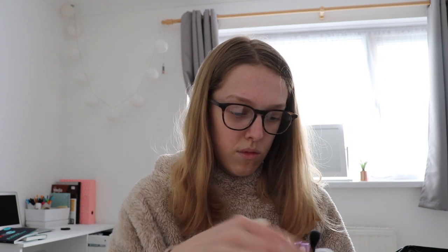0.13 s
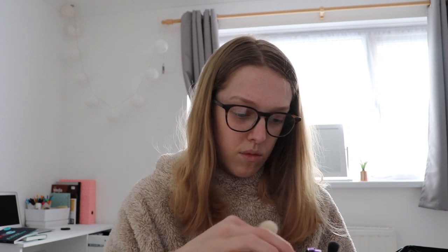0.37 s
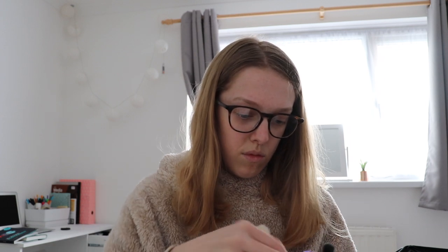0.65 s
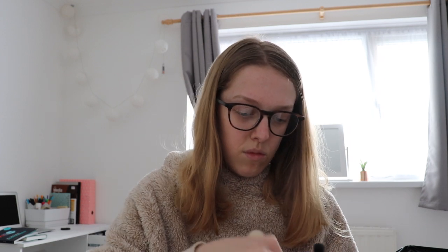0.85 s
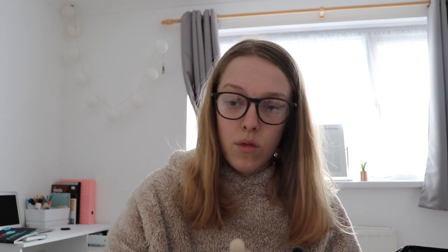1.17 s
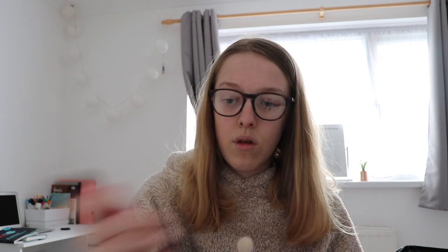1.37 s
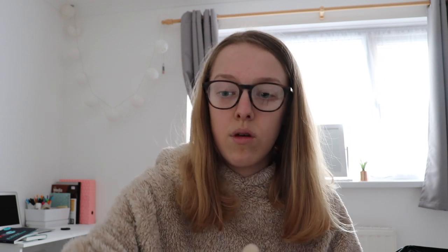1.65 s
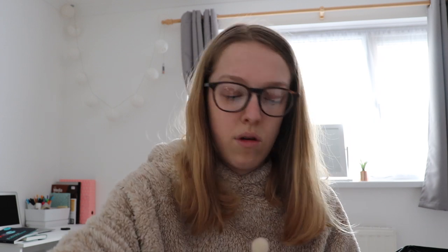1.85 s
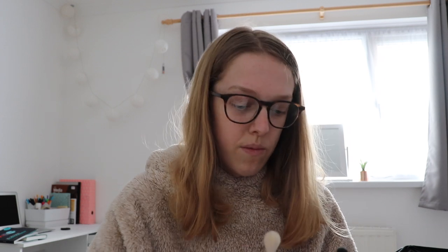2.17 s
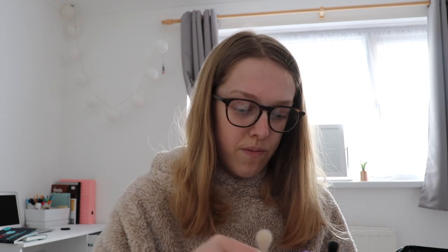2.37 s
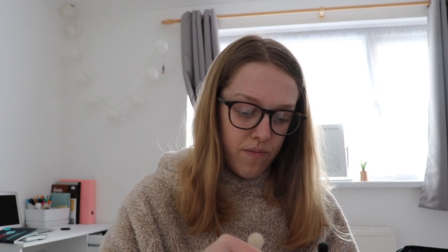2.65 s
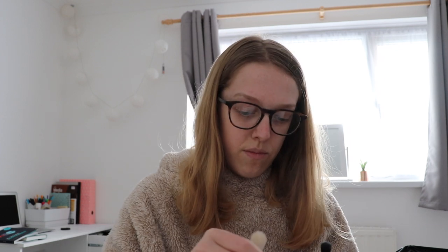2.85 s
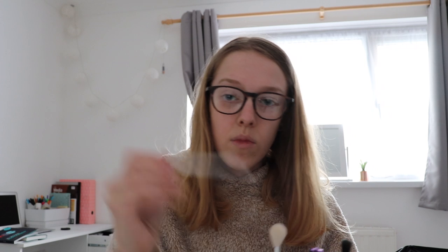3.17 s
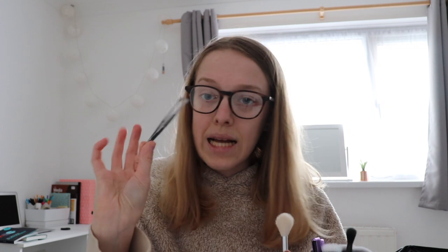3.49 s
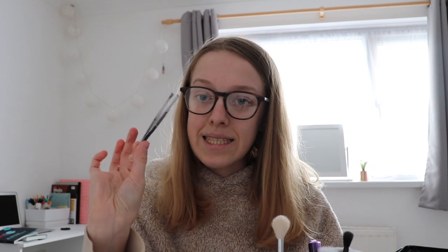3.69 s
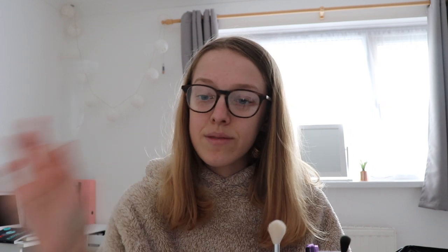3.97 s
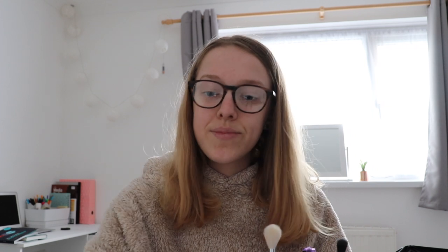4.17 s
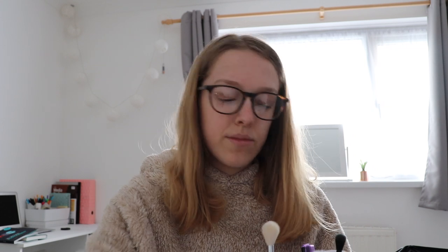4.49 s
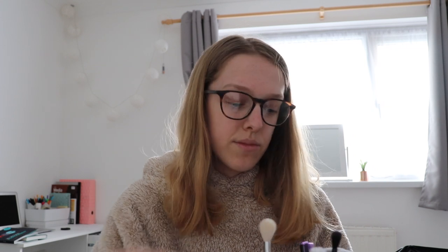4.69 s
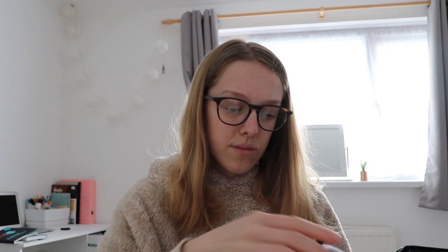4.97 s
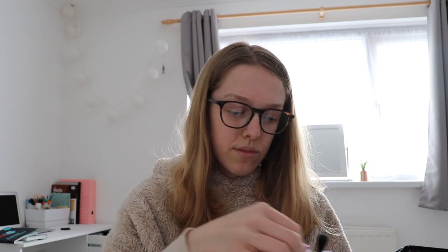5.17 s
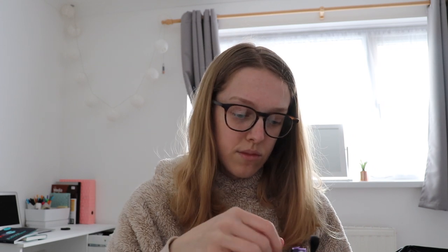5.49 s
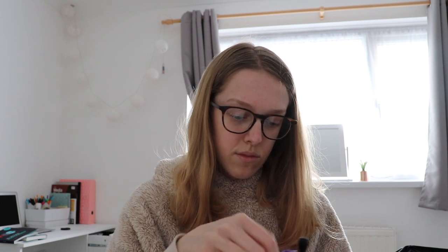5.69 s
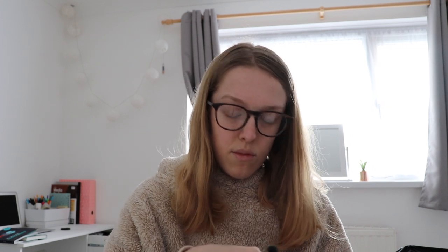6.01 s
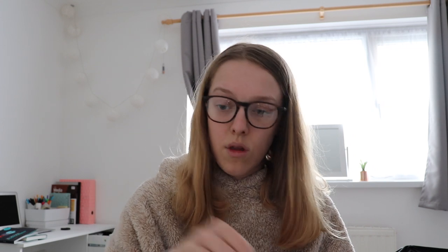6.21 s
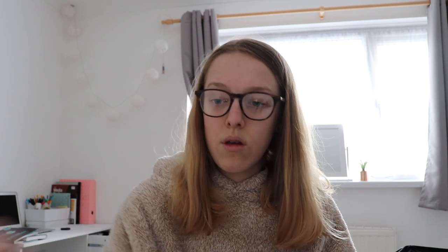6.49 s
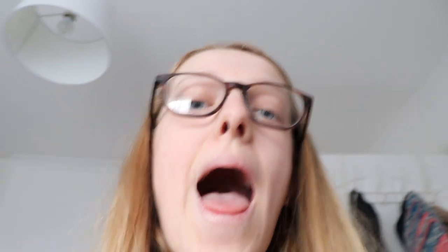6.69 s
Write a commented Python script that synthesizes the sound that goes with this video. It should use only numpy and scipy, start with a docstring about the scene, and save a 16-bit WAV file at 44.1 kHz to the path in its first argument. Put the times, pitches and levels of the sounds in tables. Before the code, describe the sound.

Close to the microphone in a small, quiet bedroom, a hand sorts through a bag of plastic makeup tubes, which click, knock and rustle. One tube drops into the bag and chatters. A hard piece lands on the desk, bounces and rocks. After more clicking, a second piece lands loudly and tumbles with a thin metallic ring. The sorting resumes, followed by a soft, close bump.

```python
"""A hand sorts through a bag in a small, still bedroom: plastic makeup tubes click, knock and slide.
At 1.2 s a tube drops into the bag and chatters to rest. At 1.9 s a piece lands on the desk, bounces and
rocks; then rubbing draws a hollow note from the bag. At 4.4 s a second piece lands and tumbles over its
facets while a metal part rings. Sorting resumes, with a soft, close bump at 6.6 s.
Throughout, the closest clicks overload the microphones."""
import sys
import numpy as np
from scipy import signal
from scipy.fft import rfft, irfft, next_fast_len
from scipy.io import wavfile

SR = 44100
rng = np.random.default_rng(int(sys.argv[2]) if len(sys.argv) > 2 else 0)


def inscribe(sig):
    """Save sig as 16-bit PCM at rate SR to the path in sys.argv[1].

    A 1-D sig is mono; a 2-D sig holds one channel per row.
    Samples are clipped to [-1, 1] before scaling.
    """
    pcm = np.round(np.clip(np.atleast_2d(sig).T, -1, 1) * 32767)
    wavfile.write(sys.argv[1], SR, pcm.astype(np.int16))


N = 302085
TIME_S = np.arange(N) / SR

# knock, clack, click and tick ranges: low_hz, high_hz
REGISTERS = [(150, 1200), (1200, 2800), (2800, 6500), (6500, 16000)]
# resonances of the tubes and full bag: centre_hz, width_hz, gain_db
TUBE_MODES = [(437, 128, 1.5), (582.3, 23.2, 7.5), (647, 27.5, -14), (852, 14, -11.5), (1009, 146.4, 10),
              (1538, 88, -7.5), (1916, 99, -3.5), (3304, 567, 4.5), (4883, 223, -4), (5906, 683, 7),
              (6597, 707, 8.5)]
# resonances of the desk top: centre_hz, width_hz, gain_db
DESK_MODES = [(150.8, 13.4, 6.5), (192.5, 13, 14), (264.2, 28, 6.5), (299, 28, 4), (338.4, 58, 5.5),
              (488.6, 70, -1.5), (578.2, 126, 8.5), (678.8, 29.6, 4.5), (772, 22, 5.5), (1215.6, 12.7, 8.5),
              (2110, 46, 3.5), (3240, 800, 0)]
# plastic contact spectrum: freq_hz, level_db
PLASTIC_COLOUR = [(100, -49.5), (300, -16.5), (500, 3.5), (1200, 3.5), (3500, 18), (6000, 14.5),
                  (9500, 4.5), (12000, -2.5), (16000, -6.5)]
# desk contact spectrum: freq_hz, level_db
BOARD_COLOUR = [(70, -14), (180, -5), (600, 1), (1100, 6), (4000, 8.5), (7500, 15), (10000, -10),
                (16000, -22)]
# reverb send of the metal ring and chink: freq_hz, gain_db
METAL_WET = [(6000, -11), (15000, -12.5)]


def tube_clicks():
    """Hollow plastic tubes click together, each with its own note."""
    # tube on tube: start_s, level_db, tilt_db_per_octave, ring_hz, t60_s
    clicks = [(.0093, -23, -0.5, 2693, 0.0665), (.1743, -22.5, 1.37, 6370, 0.0206),
              (0.1827, -25.5, 1.5, 9400, 0.104), (.23, -29.5, 0, 5900, 0.047),
              (0.2583, -14, -0.32, 3630, 0.0307), (.2835, -19.5, 1.5, 3470, 0.054),
              (0.3333, -23.5, 2, 3670, 0.07), (.445, -24.5, 0.5, 3480, 0.047),
              (0.5105, -14, 0.5, 5630, .022), (.5514, -29, -1, 4600, 0.088), (.627, -38.5, -2, 4960, 0.066),
              (.8845, -26, -1, 3510, 0.055), (.942, -30, 1.5, 5500, 0.0184),
              (0.9827, -29.5, 1.5, 5500, 0.052), (1.0079, -26.5, -0.5, 5400, 0.0093),
              (1.017, -28, -1, 3430, 0.0505), (1.036, -34, 4, 4500, 0.0195),
              (1.0789, -27.5, -0.5, 3000, 0.0224), (1.1285, -35.5, 3.5, 7300, 0.0155),
              (1.521, -47.5, -1, 2100, 0.0106), (1.841, -26.5, 1, 3640, 0.086),
              (1.8578, -24.5, 0.5, 5400, 0.082), (1.8671, -22, -2, 4890, 0.038),
              (2.6152, -19, 1.5, 3490, 0.062), (2.6327, -19, 0.78, 3260, 0.029),
              (2.6564, -24.5, -.5, 5020, 0.0305), (2.8092, -32.5, -1, 3300, 0.043),
              (2.8628, -39, -2, 4880, 0.039), (2.995, -31, -0.08, 3290, 0.0326),
              (3.0805, -33, 2.5, 5300, 0.36), (3.1414, -17, 0.64, 3410, 0.0269),
              (3.3622, -25, 1.5, 10700, 0.016), (3.4014, -46, 0, 4900, 0.0114),
              (3.6158, -36, 0, 5000, 0.00302), (4.164, -51, -3.5, 1700, 0.015),
              (5.267, -42, -3, 2820, 0.041), (5.2987, -19.5, 0.02, 3270, 0.0755),
              (5.3318, -25, 0, 5600, 0.116), (5.457, -41, -2, 3490, 0.051),
              (5.5405, -32.5, 1, 5706, 0.0145), (5.967, -32, -0.5, 4320, 0.0274),
              (6.0011, -30.5, -0.5, 3500, 0.063), (6.0508, -11, 1.35, 2130, 0.017),
              (6.2033, -30, 0, 3730, 0.0106), (6.2509, -24, 0, 6240, 0.066),
              (6.3222, -23.5, 0.5, 6800, 0.166), (6.33, -19, 3, 6770, 0.0333),
              (6.4411, -27.5, -0.66, 3340, 0.0277)]
    # balance per register: gain_db
    mix_db = [-16.5, -5.5, 1.5, -2]
    out = np.zeros((2, N))
    for start_s, level_db, tilt, ring_hz, t60_s in clicks:
        click = contact(tilted(mix_db, level_db, tilt), PLASTIC_COLOUR, TUBE_MODES, t60_s,
                        ring_hz, ring_db=5, ring_q=14.7, bass_hold=1.343)
        add(out, start_s, in_bag(click))
    return out * amp(3)


def tube_knocks():
    """Tubes knock on the bottom of the bag, all with one dull voice."""
    # tube on bag: start_s, level_db
    knocks = [(.0005, -31), (.0311, -35), (0.6771, -35.5), (.6972, -40), (.7099, -43.5), (1.0417, -40),
              (1.0827, -42.5), (5.5244, -44.5), (5.924, -51.5), (5.9751, -38.5), (6.0111, -37.5)]
    mix_db = np.array([2, -12.5, -15, -15.5])
    out = np.zeros((2, N))
    for start_s, level_db in knocks:
        knock = contact(level_db + mix_db, PLASTIC_COLOUR, TUBE_MODES, t60_s=0.0539,
                        ring_hz=970, ring_db=-5, ring_q=11.2, bass_hold=0.964)
        add(out, start_s, in_bag(knock))
    return out * amp(3)


def dropped_tube():
    """A tube falls into the bag, booms, lands three times and chatters in ever shorter hops."""
    # landings: start_s, level_db, tilt_db_per_octave
    drops = [(1.2227, -23, -2), (1.2506, -18, .5), (1.2806, -12.5, 1)]
    # resonances of the tube: centre_hz, width_hz, relative_db
    body_modes = [(597, 15.8, -3.5), (865, 195, -4), (1488, 59, -1.5), (2206, 104, -9.5), (2730, 36, -13.5),
                  (3228, 95, -5.5), (3455, 200, 0), (4200, 51, -5.5), (5460, 32, -19.5)]
    # lowest bag modes, swung by the first landing: pitch_hz, level_db, t60_s
    bag_modes = [(595, -18, .13), (830, -22, .05)]
    chatter_s, chatter_db, hop_s, shrink, loss_db = 1.3145, -25.5, 0.017, 0.94, 3.5
    mix_db = [-1.5, -3, 2.5, -13.5]
    hops = [(chatter_s + hop_s * (1 - shrink ** k) / (1 - shrink), chatter_db - loss_db * k, -1.2)
            for k in range(5)]
    body = [(hz, width_hz, db + 13.5) for hz, width_hz, db in body_modes]
    out = np.zeros((2, N))
    for start_s, level_db, tilt in drops + hops:
        blow = contact(tilted(mix_db, level_db, tilt), PLASTIC_COLOUR, body, t60_s=0.0338,
                       ring_hz=3360, ring_db=1, ring_q=7.7, bass_hold=1.56)
        add(out, start_s, in_bag(blow))
    add(out, drops[0][0], in_bag(sum(damped_note(*mode) for mode in bag_modes)))
    return out


def desk_landings():
    """Hard pieces strike the desk and bounce; the board booms under them."""
    # piece on desk: start_s, level_db, tilt_db_per_octave, ring_hz, t60_s, boom_db, boom_hz
    hits = [(1.922, -14.5, 2.5, 5360, 0.034, -24.5, 643), (1.948, -28, -2.1, 4500, 0.049, -34, 299),
            (1.9594, -39, -6, 3570, 0.051, -21.5, 624), (1.973, -9, 0.26, 4700, 0.0056, -31, 520),
            (2.0647, -19.5, -1.02, 3100, 0.00575, -15, 648), (2.0837, -21, -0.6, 2960, 0.06, -23.5, 288),
            (2.1089, -33, -2, 2880, 0.031, -27, 271), (2.2227, -52, -4, 870, 0.047, -36, 608),
            (2.4418, -17, 1.2, 11000, 0.0079, -19, 664.5), (4.4231, -16, -1.43, 5771, 0.00493, -23, 639),
            (4.442, -29.5, 1, 6000, 0.033, -39.5, 600), (4.4629, -8, -0.69, 2990, 0.0107, -10.5, 498.1),
            (4.508, -19, 3.53, 8480, 0.056, -42.5, 557), (4.533, -14, 0, 6200, 0.0114, -26.5, 478),
            (4.569, -20, -1.5, 1610, 0.0167, -33, 563), (4.647, -13.5, 0.5, 3990, 0.0097, -48, 570),
            (4.668, -22, 0, 4020, 0.0466, -42, 570)]
    mix_db = [-6.5, -3.5, 0.5, -3]
    out = np.zeros((2, N))
    for start_s, level_db, tilt, ring_hz, t60_s, boom_db, boom_hz in hits:
        blow = contact(tilted(mix_db, level_db, tilt), BOARD_COLOUR, DESK_MODES, t60_s,
                       ring_hz, ring_db=0, ring_q=5.28, bass_hold=1.65)
        add(out, start_s, on_desk(blow + damped_note(boom_hz, boom_db, t60_s=0.0345)))
    return out


def chink():
    """A bright, choked note as the first piece touches the desk."""
    note = damped_note(pitch_hz=8430, level_db=-5, t60_s=0.022)
    out = np.zeros((2, N))
    add(out, 1.9221, placed(note, lead_samples=9.65, pan_db=5.5, wet=METAL_WET, near_db=-18))
    return out


def rocking():
    """The first piece rocks to rest: three weakening swings, silent at each turning point."""
    # rocking spectrum: freq_hz, level_db
    colour = [(100, -24.5), (170, -6.5), (400, -6.5), (600, -2.5), (800, -12.5), (1200, -43), (5000, -27)]
    start_s, swing_s, level_db, loss_db = 2.07, 0.09834, -42, 3
    swings = np.clip((TIME_S - start_s) / swing_s, 0, 3)
    speed = amp(level_db - loss_db * swings) * np.abs(np.sin(np.pi * swings))
    rumble = grains(colour, DESK_MODES, rate_per_s=4000, spread_db=3)
    return on_desk(speed * rumble)[:, :N]


def tumbling():
    """The second piece rumbles louder until it is stopped, while the taps of its facets weaken."""
    # rolling spectrum: freq_hz, level_db
    colour = [(80, -41.5), (180, -3), (500, -6), (950, -0.5), (1500, -5), (2500, -11), (4000, -17),
              (6500, -29.5), (9000, -35), (15000, -61.5)]
    # resonances of the barrel: centre_hz, width_hz, gain_db
    barrel_modes = [(1274, 71, 7), (1617, 40, 12), (2264, 110, 3), (2943, 160, 0), (3665, 120, 14)]
    start_s, stop_s, release_s, roll_db, growth_db_per_s = 4.425, 4.785, 0.0247, -35, 20
    first_tap_s, spacing_s, tap_db, loss_db = 4.571, 0.0245, -24.5, 1.23
    mix_db = np.array([-6.5, 3.5, -5.5, -12.5])
    modes = DESK_MODES + barrel_modes
    gate = (TIME_S > start_s) * np.clip(1 - (TIME_S - stop_s) / release_s, 0, 1)
    envelope = gate * amp(roll_db + growth_db_per_s * (TIME_S - start_s))
    out = on_desk(envelope * grains(colour, modes, rate_per_s=4000, spread_db=3))[:, :N]
    for k in range(10):
        tap = contact(tap_db - loss_db * k + mix_db, BOARD_COLOUR, modes, t60_s=0.0246,
                      ring_hz=1595, ring_db=5, ring_q=26, bass_hold=0.84)
        add(out, first_tap_s + k * spacing_s, on_desk(tap))
    return out


def metal_ring():
    """A thin metal part rings after each blow, two close modes beating; damped as the piece rests."""
    # blows: start_s, level_db
    hits = [(4.423, -45), (4.483, -33.5), (4.647, -37)]
    # metal modes: pitch_hz, gain_db, t60_s
    modes = [(6635, -9, 1.6), (8362, 2, .55), (8452, 2, .5), (10102, -4, .6), (12014, -4, .6),
             (12903, -3, .45), (14090, -8, .4)]
    attack_s, rest_s, damping_db_per_s = 0.003, 4.8, 120
    out, t = np.zeros(N), np.arange(SR) / SR
    for start_s, level_db in hits:
        ring = sum(amp(db) * decay(t, t60_s) * np.sin(2 * np.pi * (hz * t + rng.random()))
                   for hz, db, t60_s in modes)
        add(out, start_s, amp(level_db) * ring * rise(t, attack_s))
    damping = amp(-damping_db_per_s * np.maximum(TIME_S - rest_s, 0))
    return placed(out * damping, lead_samples=0, pan_db=-1, wet=METAL_WET, near_db=-21.5)[:, :N]


def rustle():
    """Tubes and lining rub in swells of tiny slips; neighbouring tubes jostle."""
    # strokes: start_s, end_s, level_db
    slides = [(0.139, 0.389, -50), (0.419, 0.494, -46.5), (0.502, 0.634, -53), (0.936, 1.05, -50),
              (1.241, 1.337, -39.5), (1.85, 1.921, -40.5), (2.729, 2.88, -50.5), (3.04, 3.082, -52.5),
              (3.072, 3.152, -46.5), (5.279, 5.367, -47), (5.97, 6.052, -56), (6.244, 6.383, -47),
              (6.758, 6.855, -60.5)]
    # friction spectrum: freq_hz, level_db
    colour = [(240, -71), (400, -21), (1490, -8), (1870, -5), (2630, -0.5), (3420, 0.5), (5870, -5.5),
              (6340, -3), (9920, -10.5), (16000, -24)]
    # hollow stirred by the sliding: centre_hz, width_hz, gain_db
    hollow = [(504.5, 115, 12.5)]
    strokes = sum(swell(*slide) for slide in slides)
    slips = amp(9) * grains(colour, hollow, rate_per_s=3500, spread_db=2.5)
    jostle = amp(2) * grains(PLASTIC_COLOUR, TUBE_MODES, rate_per_s=90, spread_db=2)
    return in_bag(strokes * (slips + jostle))[:, :N]


def drag():
    """A tube drawn along the bag sustains one soft, hollow note."""
    # spectrum of the bag's hollow: freq_hz, level_db
    colour = [(300, -45.5), (420, -10), (460, -2.5), (495, -2.5), (550, -14.5), (800, -45)]
    stroke = swell(start_s=2.517, end_s=2.92, level_db=-50.5)
    return in_bag(stroke * noise(N, colour))[:, :N]


def low_thuds():
    """Short, deep thuds: a soft bag bump, a handling thud and the low end of the heaviest landings."""
    # thuds: start_s, level_db
    thuds = [(0.517, -41), (1.972, -47.5), (4.129, -47), (4.462, -42)]
    out, t = np.zeros(N), np.arange(SR // 4) / SR
    envelope = rise(t, attack_s=0.0078) * decay(t, t60_s=0.204)
    for start_s, level_db in thuds:
        rumble = noise(len(t), [(20, -1), (70, -3), (190, 5), (450, -26), (1200, -60.5)])
        add(out, start_s, amp(level_db) * envelope * rumble)
    return out


def bump():
    """A soft bump by the microphones: low push, small knock, brief high hiss."""
    start_s, level_db, push_hz, left_right_db = 6.644, -27, 130, [[-3.5], [3]]
    out, t = np.zeros(N), np.arange(SR // 8) / SR
    push = np.sin(2 * np.pi * push_hz * t) * rise(t, attack_s=0.00124) * decay(t, t60_s=0.048)
    knock = noise(len(t), [(40, -20.5), (700, 0.5), (1300, -18), (4000, -14), (12000, -38)])
    knock *= amp(-5) * decay(t, t60_s=0.058)
    hiss = noise(len(t), [(6000, -8.5), (8200, 3.5), (16000, -12)])
    hiss *= amp(-16.5) * np.interp(t, [0, 0.07, 0.09], [1, 0.6, 0])
    add(out, start_s, amp(level_db) * (push + knock + hiss))
    return out * amp(left_right_db)


def room_tone():
    """Steady room tone and microphone hiss."""
    # still-room spectrum: freq_hz, level_db
    colour = [(15, -60.5), (25, -17.5), (102, -4), (130, -6.5), (263, -6.5), (344, -9.5), (405, -8.5),
              (451, -7.5), (503, -9.5), (734, -12), (1330, -11.5), (1890, -14), (3520, -15), (16000, -27)]
    return amp(-53.5) * unit(coloured(diffuse(N), colour))


def contact(levels_db, colour, body, t60_s, ring_hz, ring_db, ring_q, bass_hold):
    """A dying crack rings the body and the struck piece; levels_db sets each register's first 10 ms."""
    t = np.arange(SR // 6) / SR
    crack = coloured(rng.standard_normal(len(t)), colour) * rise(t, attack_s=0.000082)
    modes = list(body) + [(ring_hz, ring_hz / ring_q, ring_db)]
    bass = resonate(crack * decay(t, t60_s * bass_hold), modes)
    upper = resonate(crack * decay(t, t60_s), modes)
    out = np.zeros(len(t))
    for level_db, band_hz, x in zip(levels_db, REGISTERS, (bass, upper, upper, upper)):
        part = signal.sosfilt(signal.butter(2, band_hz, 'band', fs=SR, output='sos'), x)
        out += amp(level_db) * part / np.std(part[:SR // 100])
    return out


def tilted(mix_db, level_db, tilt_db_per_octave):
    """Register levels; a harder contact tips them towards the treble, about the click register."""
    octaves = np.mean(np.log2(REGISTERS), axis=1)
    return level_db + np.array(mix_db) + tilt_db_per_octave * (octaves - octaves[2])


def damped_note(pitch_hz, level_db, t60_s):
    """One damped mode; a small surface radiates little below its own note."""
    t = np.arange(SR // 6) / SR
    swing = amp(level_db) * decay(t, t60_s) * np.sin(2 * np.pi * pitch_hz * t)
    return signal.sosfilt(signal.butter(2, 0.6 * pitch_hz, 'high', fs=SR, output='sos'), swing)


def grains(colour, modes, rate_per_s, spread_db):
    """Tiny random contacts of uneven size ring a body; rms 1."""
    sizes = rng.standard_normal(N) * amp(spread_db * rng.standard_normal(N))
    impulses = unit(sizes * (rng.random(N) < rate_per_s / SR))
    return unit(resonate(coloured(impulses, colour), modes))


def in_bag(x):
    """The bag stands just right of centre."""
    # reverb send: freq_hz, gain_db
    wet = [(200, -12.5), (900, 0), (2000, -3), (6000, -7), (14000, -5)]
    return placed(x, lead_samples=-1.585, pan_db=-3, wet=wet, near_db=-13)


def on_desk(x):
    """The free part of the desk lies close by on the left."""
    # reverb send: freq_hz, gain_db
    wet = [(200, 0.5), (600, -5), (1500, -1.5), (6000, -7), (14000, -5.5)]
    return placed(x, lead_samples=9.27, pan_db=2, wet=wet, near_db=0)


def placed(x, lead_samples, pan_db, wet, near_db):
    """Direct sound (positive lead and pan: left), scatter from nearby surfaces, then the room."""
    # bedroom decay: freq_hz, t60_s
    room_decay = [(150, 0.282), (500, 0.2), (1500, 0.2444), (5000, 0.234), (9000, 0.25), (15000, 0.164)]
    # scatter off small things, weak in bass: freq_hz, level_db
    near_colour = [(250, -10.5), (1500, 0), (16000, -0.5)]
    size = SR // 2
    t = np.arange(size) / SR
    hz, frame_s, spectra = signal.stft(diffuse(size), SR, nperseg=256)
    t60_s = along(room_decay, hz)[:, None]
    equal_energy = np.sqrt(2 * np.log(1000) / (t60_s * SR))
    fade = amp(along(wet, hz)[:, None]) * decay(frame_s, t60_s) * equal_energy
    tail = signal.istft(spectra * fade, SR, nperseg=256)[1][:, :size]
    near = coloured(diffuse(size), near_colour) * decay(t, t60_s=0.00755)
    response = tail * np.clip(t / 0.00158, 0, 1) + amp(near_db) * near / np.linalg.norm(near[0])
    out = signal.fftconvolve(x[None], response, axes=1)
    sides = np.array([[0.5], [-0.5]])
    lead_s = (lead_samples + rng.normal(0, 0.792)) / SR  # no two contacts in quite the same spot
    direct = filtered(x, lambda f: amp(pan_db * sides) * np.exp(2j * np.pi * f * sides * lead_s))
    add(out, 0, direct)
    return out


def diffuse(size):
    """Stereo noise from all around: alike in the bass, unrelated in the treble."""
    # left-right likeness: freq_hz, coherence
    likeness = [(30, 0.5), (200, 0.566), (600, 0.551), (1500, 0.059), (4000, 0.049), (12000, 0.12)]

    def mid_side_gains(hz):
        angle = np.arccos(np.clip(along(likeness, hz), -1, 1)) / 2
        return np.array([np.cos(angle), np.sin(angle)])

    mid, side = filtered(rng.standard_normal((2, size)), mid_side_gains)
    return np.array([mid + side, mid - side])


def amp(db):
    return 10 ** (np.asarray(db) / 20)


def unit(x):
    return x / np.sqrt(np.mean(x ** 2) + 1e-20)


def rise(t, attack_s):
    return 1 - np.exp(-t / attack_s)


def decay(t, t60_s):
    return amp(-60 * t / t60_s)


def swell(start_s, end_s, level_db):
    """One arched stroke."""
    progress = np.clip((TIME_S - start_s) / (end_s - start_s), 0, 1)
    return amp(level_db) * np.sqrt(np.abs(np.sin(np.pi * progress)))


def along(points, hz):
    """Interpolate (freq_hz, value) points on a log axis."""
    freqs_hz, values = np.transpose(points)
    return np.interp(np.log(hz + 1), np.log(freqs_hz + 1), values)


def filtered(x, response):
    """Apply the gain response(hz) to x."""
    size = x.shape[-1]
    padded = next_fast_len(size + size // 8)
    return irfft(rfft(x, padded) * response(np.fft.rfftfreq(padded, 1 / SR)), padded)[..., :size]


def coloured(x, colour):
    """Shape x by (freq_hz, level_db) points."""
    return filtered(x, lambda hz: amp(along(colour, hz)))


def noise(size, colour):
    """Noise shaped by (freq_hz, level_db) points; rms 1."""
    return unit(coloured(rng.standard_normal(size), colour))


def resonate(x, modes):
    """x plus the ringing it excites in the modes."""
    return x + sum(amp(db) * signal.lfilter(*signal.iirpeak(hz, hz / width_hz, SR), x)
                   for hz, width_hz, db in modes)


def add(track, start_s, sound):
    part = track[..., max(round(start_s * SR), 0):][..., :sound.shape[-1]]
    part += sound[..., :part.shape[-1]]


def scene():
    """The bag, the desk, low thuds, a bump and the still room."""
    bag = tube_clicks() + tube_knocks() + dropped_tube() + rustle() + drag()
    impacts = desk_landings() + low_thuds()
    pieces = rocking() + tumbling() + metal_ring() + chink()
    return bag + impacts + pieces + bump() + room_tone()


def record(dry):
    """Peaks flatten at full scale; a steep low-pass limits the band."""
    cutoff_hz = 16000
    clipped = dry / (1 + np.abs(dry) ** 8) ** (1 / 8)
    return filtered(clipped, lambda hz: 1 / (1 + (hz / cutoff_hz) ** 120))


dry = scene()
out = record(dry)
inscribe(out)
```